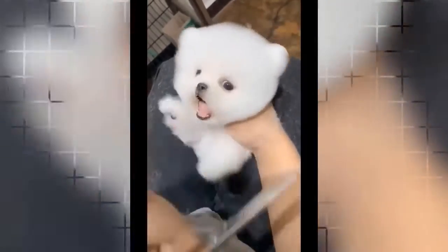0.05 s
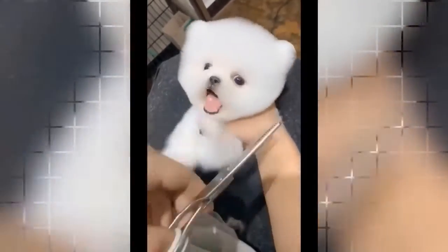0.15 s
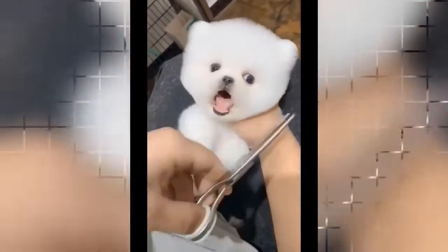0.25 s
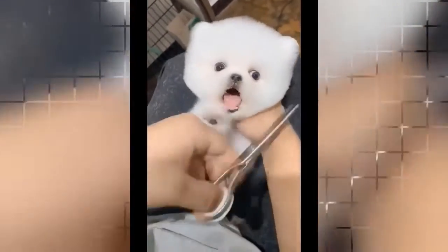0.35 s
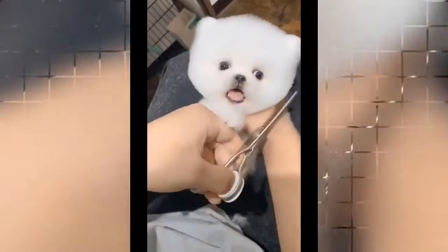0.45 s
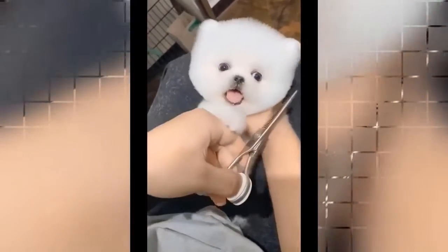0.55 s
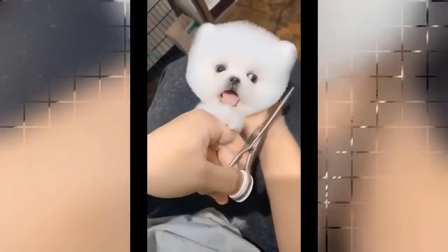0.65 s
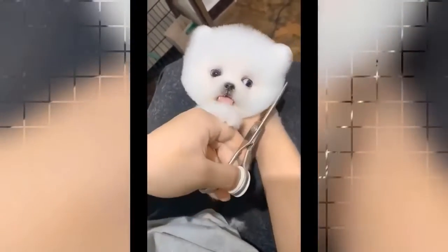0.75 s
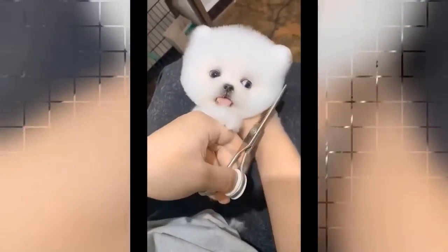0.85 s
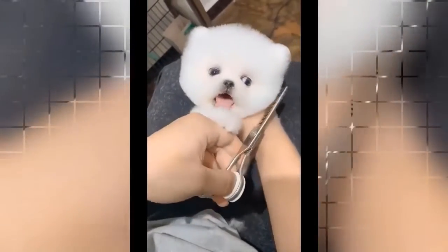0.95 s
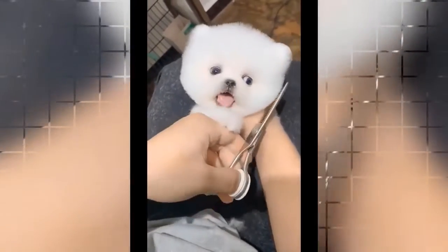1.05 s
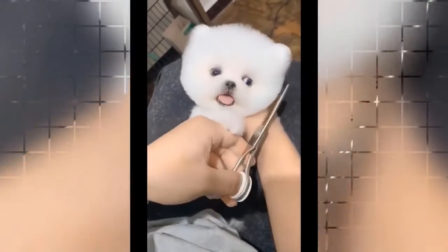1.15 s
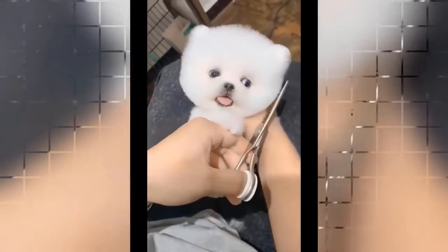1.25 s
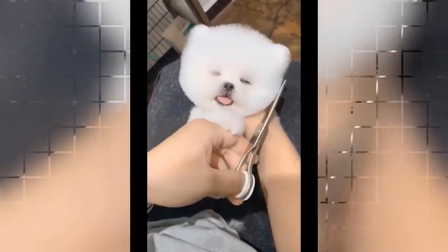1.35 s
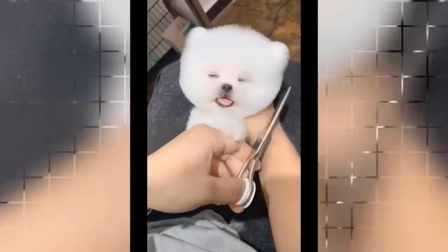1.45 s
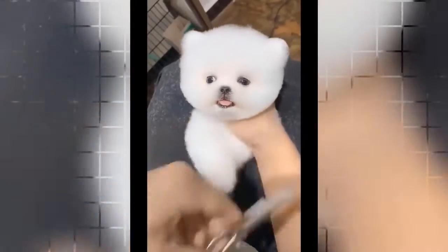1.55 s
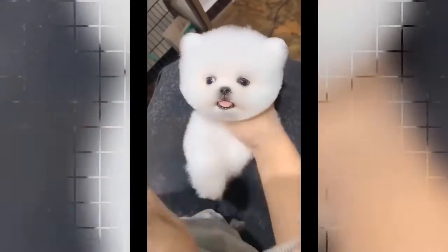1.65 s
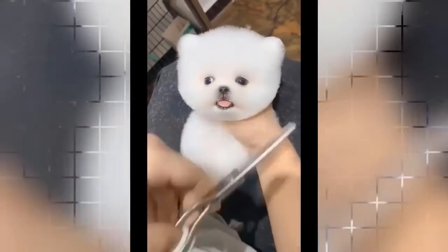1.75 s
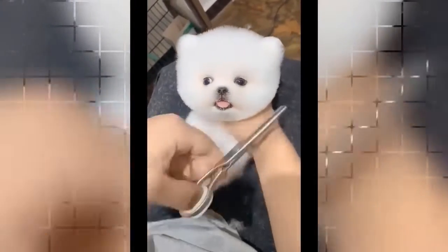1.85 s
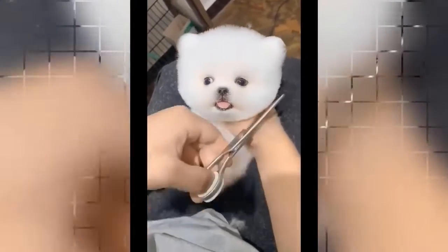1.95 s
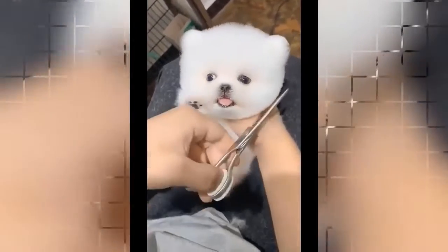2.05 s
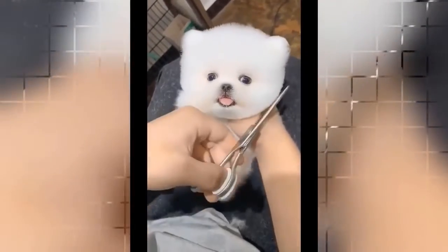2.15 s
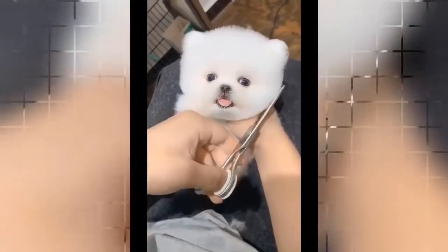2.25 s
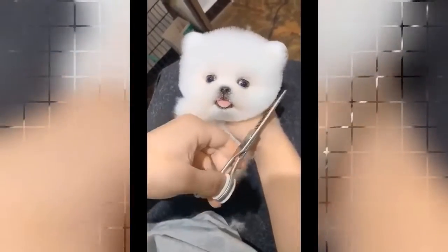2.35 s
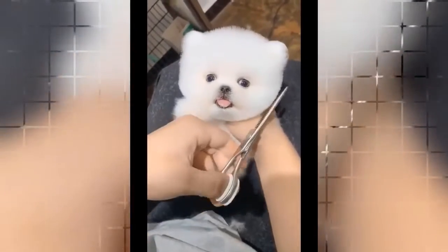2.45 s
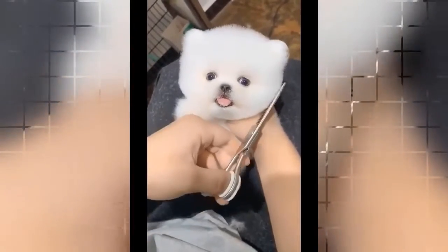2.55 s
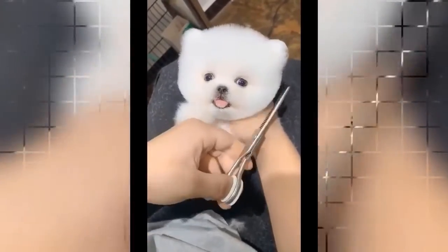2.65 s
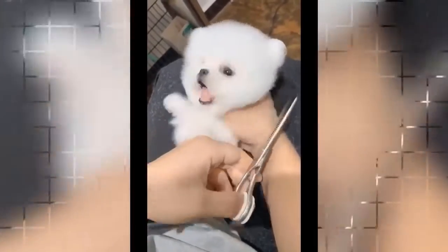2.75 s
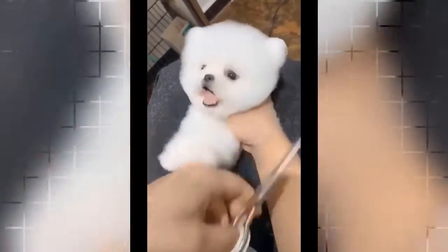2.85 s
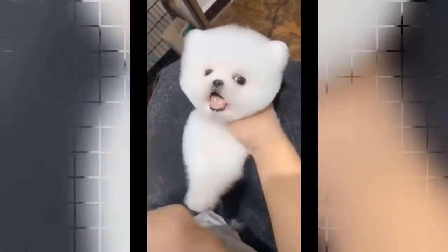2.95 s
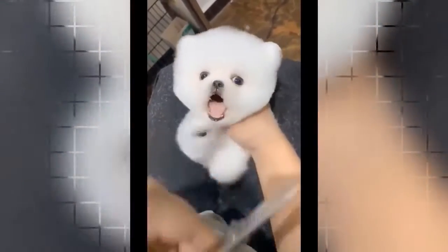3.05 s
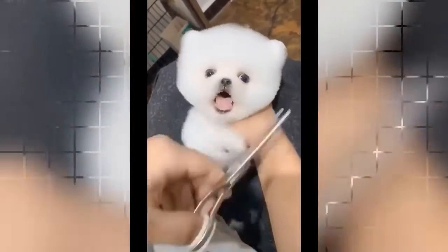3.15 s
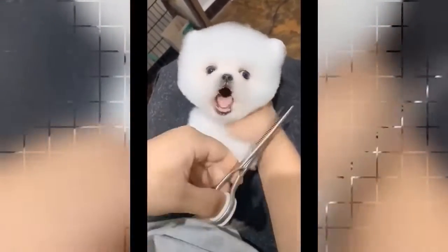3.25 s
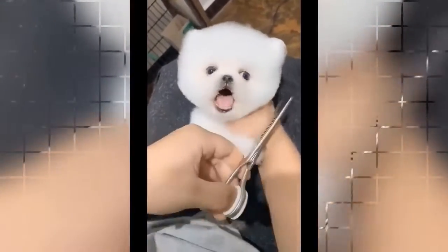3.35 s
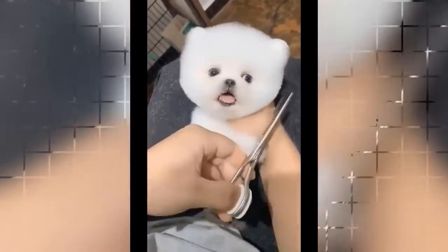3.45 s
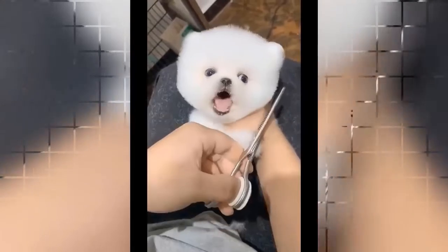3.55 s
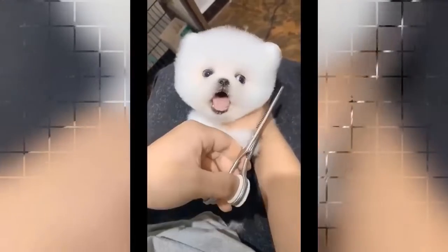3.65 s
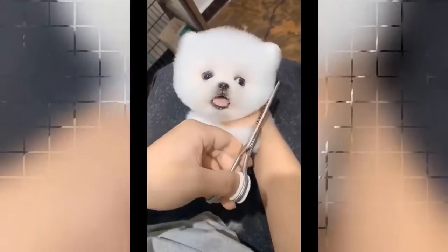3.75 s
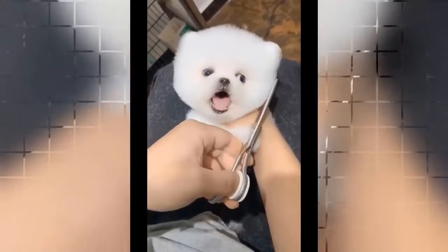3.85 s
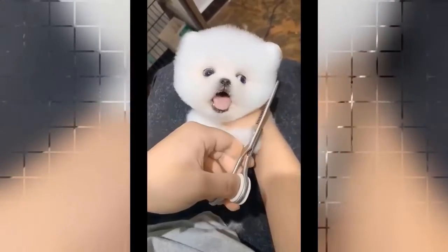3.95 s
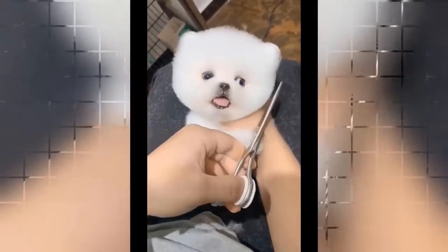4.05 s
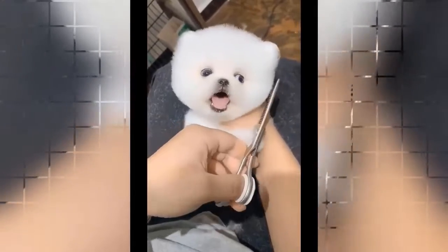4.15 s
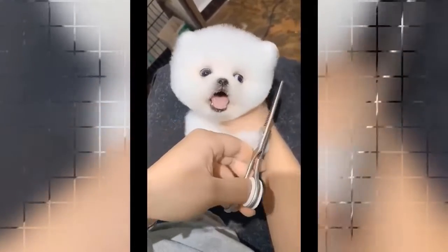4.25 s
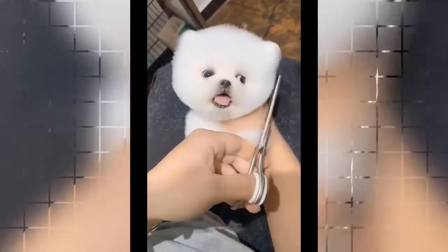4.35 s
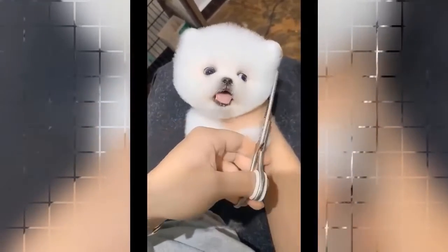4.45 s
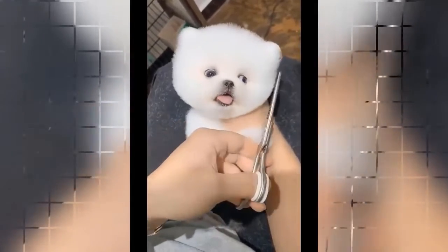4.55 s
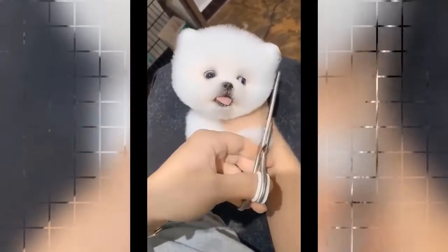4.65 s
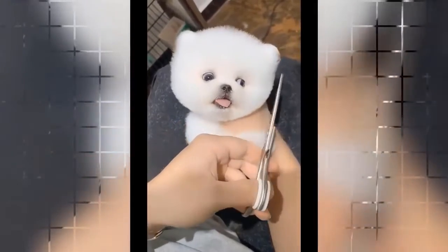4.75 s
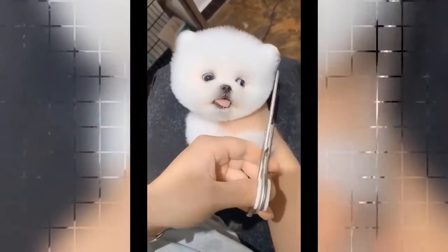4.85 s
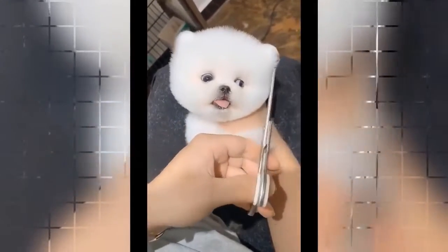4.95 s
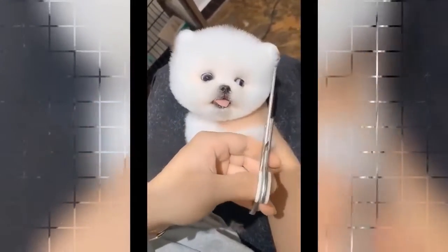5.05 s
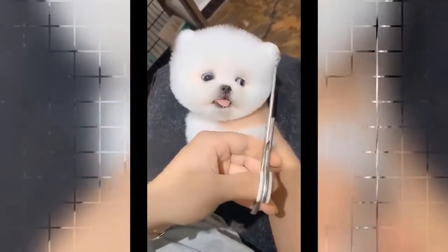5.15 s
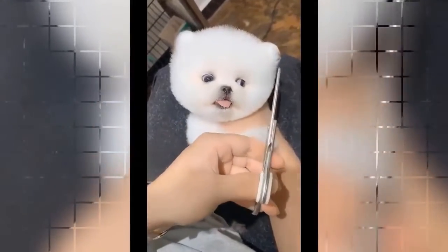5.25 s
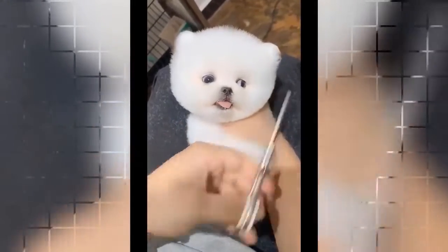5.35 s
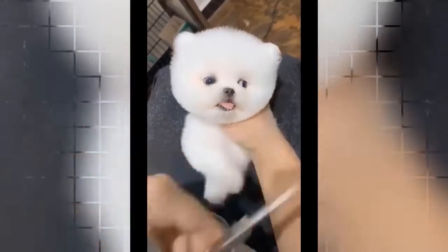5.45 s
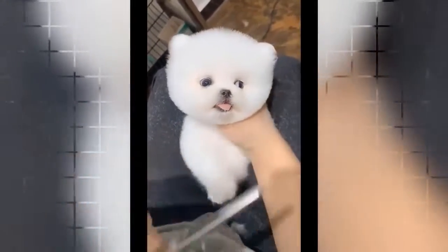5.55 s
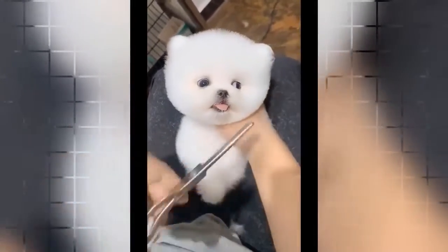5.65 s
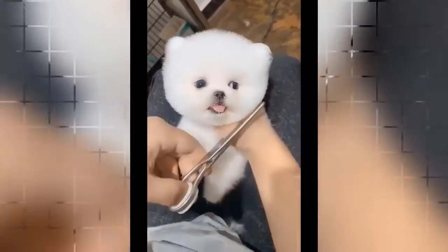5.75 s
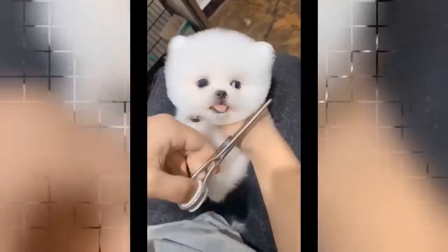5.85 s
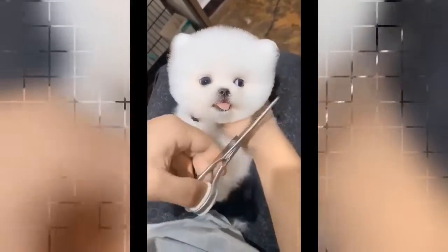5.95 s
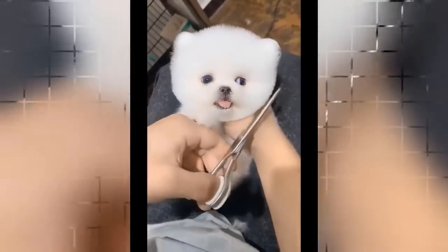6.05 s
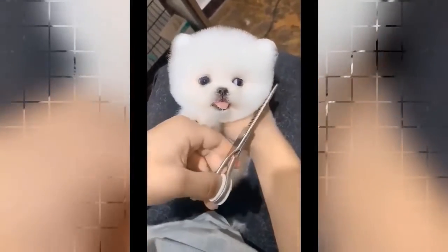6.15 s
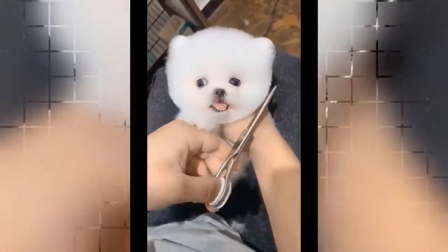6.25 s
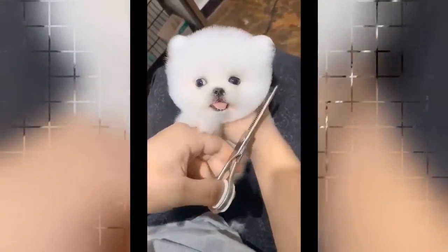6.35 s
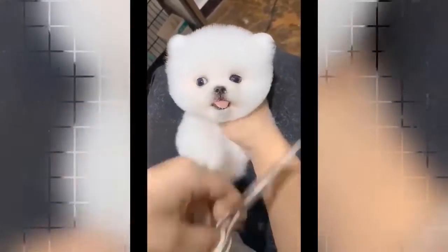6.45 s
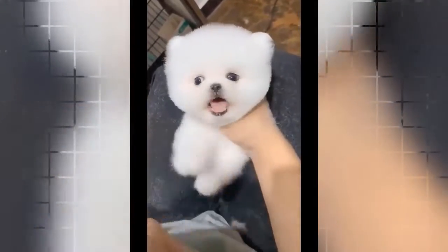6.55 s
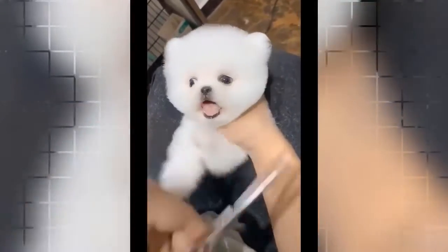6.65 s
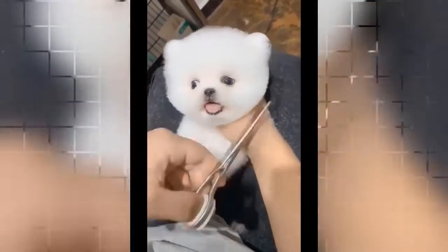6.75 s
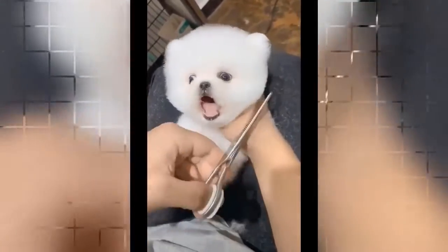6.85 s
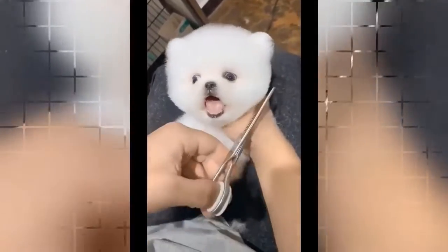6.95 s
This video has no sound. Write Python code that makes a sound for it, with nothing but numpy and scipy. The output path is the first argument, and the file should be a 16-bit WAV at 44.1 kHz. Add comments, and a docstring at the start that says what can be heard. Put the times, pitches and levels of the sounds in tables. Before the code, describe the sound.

In a small, quiet furnished room, a tiny puppy yips close to the microphone over low hum, faint steady tones and soft hiss. From 0.0 to 1.4 seconds come five high, squeaky yips, each about 0.15 seconds, rising fast then sagging breathily; the fourth is weaker. Light scissor ticks and fur rustle appear near 0.8. Between 1.5 and 2.9 the yapping stops: cloth and fur brush, the lap shifts with a dull low rumble strongest near 1.8, a tiny whimper squeaks, and small metal ticks sound. A faint indrawn whistle leads into seven regular, sharp yips from 3.0 to 4.9, about 0.3 seconds apart, the last softer. From 5.0 to 6.7 only very quiet whimpers, rustles and sparse ticks remain. One final bright yip comes at 6.9. The room adds a short, soft ring.

```python
"""A small furnished room: a tiny puppy on a lap yips close by in runs, about three a second, with soft whimpers.
Each call is a gliding stack of harmonics shaped by mouth and throat, turning breathy as the pitch sags.
Filtered noise whistles before some yips, fur rustles in noise strokes, and scissors tick as decaying sines.
A low hum, faint steady tones and hiss lie underneath; decaying noise gives the room's brief ring."""
import sys
import numpy as np
from scipy import signal
from scipy.fft import rfft, irfft
from scipy.io import wavfile
from scipy.ndimage import uniform_filter1d

SR = 44100
rng = np.random.default_rng(int(sys.argv[2]) if len(sys.argv) > 2 else 0)


def to_wav(s):
    """Save 16-bit WAV."""
    ch = np.atleast_2d(s).T  # columns
    pcm = np.round(np.clip(ch, -1, 1) * 32767)  # PCM
    wavfile.write(sys.argv[1], SR, pcm.astype(np.int16))


def volts_from_decibels(level):
    """Turn decibel levels (scalar or array-like) into linear amplitude factors."""
    exponent = np.asarray(level, float) / 20
    return 10 ** exponent


N = 307818
T = np.arange(N) / SR
TOP_HZ = 14000

# spectrum of the room hiss, before overall scaling: (frequency [Hz], density [dB per Hz])
AIR_SPECTRUM = [(41, -29.5), (70, -3), (102, -16.5), (194, -13), (431, -21.5), (550, -23), (750, -21),
                (1490, -28), (9820, -42.5), (14000, -55.5)]
AIR_DB, HUM_DB, HUM_WAVER_DB = -64, -58.5, 1
# faint steady tones of the room: (frequency [Hz], level [dB])
ROOM_TONES = [(549.1, -81), (651.4, -79.5), (1448, -81.5), (2051, -84), (2600, -87)]
# shifts of the lap: (loudest time [s], level [dB], swell per 20 dB [s], fade per 20 dB [s])
LAP_SHIFTS = [(1.522, -60.5, 0.05, 0.19), (1.766, -51.5, 0.072, 0.25)]
# pitch arches, one table a yip: (time [s], pitch [Hz], effort [dB], gape [0-1])
YIPS = [
    [(0.033, 517, -36, 0), (0.047, 690.3, -28.5, 0.32), (0.067, 857.7, -22, 0.35),
     (0.087, 908.6, -19.5, 0.32), (0.119, 859.3, -24.5, 0.35), (0.131, 716.7, -27.5, 0.23),
     (0.153, 701.4, -24, 0.61), (0.175, 661, -31, 0.76), (0.2, 670, -41.5, 0)],
    [(0.323, 572.6, -39.5, 0.2), (0.339, 694.6, -29.5, 0.36), (0.353, 767, -27.5, 0.2),
     (0.369, 756.7, -25, 0.98), (0.381, 789.6, -19, 0.73), (0.395, 813, -22.5, 0.42),
     (0.419, 697, -28.5, 0.46), (0.437, 561, -40, 0), (0.46, 536, -49, 1)],
    [(0.592, 540, -34, 0.5), (0.606, 726.4, -31.5, 0.64), (0.624, 689.3, -31.5, 0.85),
     (0.66, 787, -21, 0.73), (0.692, 650.6, -33.5, 0.14), (0.716, 542, -45.5, 0.15), (0.725, 487, -50, 0.6)],
    [(0.905, 461.2, -50, 0.5), (0.917, 521, -46, 0.8), (0.939, 663.5, -29.5, 0.4),
     (0.959, 673.7, -25.5, 0.55), (0.971, 639, -30.5, 0.5), (1.025, 443.2, -54, 0.86)],
    [(1.238, 475.3, -46.5, 0.5), (1.248, 584.7, -33.5, 0.55), (1.262, 726.4, -29, 0.56),
     (1.274, 818.6, -21.5, 0.5), (1.296, 833, -20.5, 0.36), (1.316, 732.8, -30.5, 0.7),
     (1.328, 661.5, -30, 0.3), (1.344, 555, -41, 0.58), (1.365, 518, -49.5, 0.9)],
    [(3.015, 551.3, -41.5, 0.5), (3.023, 644, -30, 0.35), (3.033, 755, -29.5, 0.53),
     (3.051, 912, -22, 0.35), (3.075, 957.5, -18.5, 0.5), (3.087, 941.4, -22, 0.84),
     (3.123, 794, -27, 0.62), (3.179, 735.6, -38, 0.48), (3.19, 760, -37, 0.6)],
    [(3.303, 529.5, -39.5, 0), (3.311, 628.4, -27.5, 0.8), (3.321, 727, -30, 0.16), (3.335, 855, -21, 0.65),
     (3.347, 861, -24.5, 0.55), (3.375, 851, -25.5, 1), (3.379, 824.4, -23, 0.7), (3.415, 578, -35.5, 0.1),
     (3.44, 475, -41.5, 0.4)],
    [(3.56, 472.2, -35.5, 0), (3.572, 632.6, -29, 0.84), (3.582, 746, -27.5, 0.4),
     (3.592, 863.5, -25, 0.84), (3.63, 913, -20, 0.47), (3.638, 877, -20, 0.9), (3.65, 792, -24.5, 0.61),
     (3.674, 664, -31.5, 0.5), (3.695, 532.9, -41.5, 0.9)],
    [(3.865, 505, -46, 0.15), (3.883, 652.2, -30.5, 0.38), (3.893, 754, -28, 0.36),
     (3.911, 884.6, -22, 0.54), (3.931, 912.6, -22, 0.35), (3.959, 753.5, -26.5, 0.54),
     (3.971, 661, -32, 0.3), (3.99, 581.5, -53, 0.6)],
    [(4.168, 533.8, -36.5, 0.66), (4.186, 682, -31, 0.33), (4.202, 811, -24.5, 0.22),
     (4.224, 838.7, -22, 0.37), (4.242, 728.8, -26, 0.5), (4.26, 631.3, -36, 0), (4.274, 602, -51, 0.77),
     (4.29, 556.4, -50.5, 0.5)],
    [(4.465, 510.5, -33, 1), (4.479, 632.5, -31.5, 0.25), (4.491, 758, -24.5, 0.56),
     (4.513, 900, -20.5, 0.43), (4.535, 901.4, -22, 0.54), (4.559, 725.5, -28, 0.7), (4.571, 618, -41, 0),
     (4.579, 603.5, -36.5, 0.5), (4.59, 569, -46, 1)],
    [(4.777, 460, -52.5, 0.5), (4.789, 553, -37, 0.85), (4.809, 690.5, -25.5, 0.5),
     (4.825, 697, -26.5, 0.73), (4.841, 672, -30, 0.82), (4.859, 551, -39, 0.02), (4.869, 481, -38, 0.82),
     (4.89, 440, -74, 0.8)],
    [(6.863, 480.3, -48, 0.8), (6.873, 608.5, -42, 0.67), (6.881, 685, -28.5, 0.46),
     (6.897, 856, -29, 0.34), (6.915, 973, -22, 0.15), (6.931, 948.5, -20.5, 0.83), (6.953, 827, -27.5, 1),
     (6.961, 793.2, -31, 0.4), (6.979, 804.4, -35.5, 0.6)],
]
# soft whimpers, one table each: (time [s], pitch [Hz], effort [dB], gape [0-1])
WHIMPERS = [
    [(1.735, 384, -47, .5), (1.747, 500, -46, 0.96), (1.76, 585, -47, .7), (1.773, 668, -43.5, 1),
     (1.779, 896, -48, 0.2), (1.797, 1006, -56, 0)],
    [(5.075, 390, -42, 1), (5.088, 428, -43.5, 0.37), (5.104, 451, -44.5, 0.1), (5.122, 528, -48, 0.67),
     (5.132, 531, -52.5, 0.7), (5.142, 455, -60, 0.67), (5.162, 450, -61, 1)],
    [(5.402, 696, -62, .5), (5.409, 712, -55, 0.53), (5.421, 731, -59.5, .5), (5.433, 787, -67, 0.34),
     (5.442, 790, -66, 0.4)],
    [(6.286, 551, -40, 0.56), (6.297, 574, -45, 0.73), (6.317, 657, -45.5, 0.9), (6.324, 678, -54, 0.76),
     (6.331, 834, -54, 0.3), (6.351, 861, -58, .4), (6.365, 851, -61, .5), (6.395, 910, -75, .6)],
    [(6.587, 590, -60, .5), (6.597, 633, -41.5, 0.45), (6.607, 630, -44.5, .6), (6.618, 777, -46.5, 0.57),
     (6.636, 875, -60, 0.35), (6.652, 900, -68, 0.56)],
]
# colour of each yip and whimper in turn: (fundamental at full effort [dB], throat resonance [Hz],
# throat against mouth [dB], treble against effort [dB])
CALL_COLOURS = [(-28, 3600, 4.5, -18.5), (-27.5, 3440, 5, -15.5), (-27, 3390, -3.5, -14),
                (-27.5, 3500, -6, -12.5), (-26.5, 3470, -5.5, -13.5), (-37.5, 2800, -18, -18),
                (-29, 3640, -4.5, -16.5), (-28, 3500, -4.5, -17.5), (-27, 3680, -7.5, -14),
                (-29.5, 3680, -3, -11), (-29, 3600, -3, -9.5), (-29.5, 3700, -8.5, -11.5),
                (-28.5, 3600, -15.5, -11.5), (-41, 3820, -20, -18), (-49, 3540, -24, -21),
                (-38, 3500, -27, -31), (-39.5, 3360, -14, -25), (-27.5, 3400, -1, -8.5)]
# a half-shut muzzle lowers the mouth resonance of each call: (drop [Hz]); negative raises it
MUZZLE_DROPS = [-0.5, 48.5, 99, 99.5, 1, 400, -1, 5, 4, -4, -2, 11.5, 50, 449, 398, 554, 453, -1]
# huskiness of each call: (extra breath and jitter [dB])
HUSKINESS = [2, 2, 3, 0, 0, 10, 0, 2, 0, 2, 0, 1, 0, 8, 14, 1, 4, 2]
# voice cracks: (time [s], half length [s], depth [0-1])
VOICE_CRACKS = [(0.118, .012, 0.02), (3.106, .012, 0.23), (3.968, .018, 0.47), (4.562, .018, 0.4),
                (5.134, 0.018, 0.48), (5.425, 0.026, 0.57), (6.94, .01, 0.13)]
# upper resonances, balanced against each other: (frequency [Hz], width [Hz], level [dB])
UPPER_RESONANCES = [(5322, 450, 10), (7320, 440, 8), (9280, 1100, 4.5), (11500, 580, -5.5)]
# breath against tone, rows for mouth, throat, treble, before huskiness and cracks:
# (at steady pitch [dB], added as the pitch sags by half [dB])
BREATHINESS = [(-20, 21), (-17, 22), (-9, 24)]
MOUTH_WIDTH_HZ, THROAT_WIDTH_HZ = 780, 510
BASE_JITTER, SHIMMER_DB = 0.004, 1.5  # jitter is a fraction of the pitch
# the fundamental follows effort only in part and thins out at high pitch
LOW_PER_EFFORT = 0.34
# weight of the fundamental: (pitch [Hz], gain [dB])
LOW_BY_PITCH = [(450, 3.5), (600, -1), (750, 0), (850, -4), (950, -5)]
# the fundamental is held back at either end of a call: the span and the dB at the very edge
LOW_ATTACK_S, LOW_ATTACK_DB, LOW_RELEASE_S, LOW_RELEASE_DB = 0.0042, -1.5, 0.012, -4
# the mouth resonance climbs with pitch and sinks as the gape widens
MOUTH_BASE_HZ, MOUTH_PER_PITCH, MOUTH_GAPE_HZ = 990, 1.176, 500
# a wide gape lets the throat out and holds back the fundamental and treble (dB per full gape)
GAPE_THROAT_DB, GAPE_LOW_DB, GAPE_TREBLE_DB = 24, 8, 4
# a sagging pitch muffles and lowers the throat and brightens the treble (for the whole pitch)
SAG_THROAT_DB, SAG_TREBLE_DB, SAG_THROAT_HZ = -25, 17, 298
# on the way up the arch, throat and treble are still veiled (dB for the whole pitch)
CLIMB_THROAT_DB, CLIMB_TREBLE_DB = -16, -2
# fur and cloth strokes: (loudest time [s], level [dB], swell per 20 dB [s], fade per 20 dB [s])
FUR_STROKES = [(.772, -59, 0.033, 0.055), (1.102, -71, .02, .04), (1.548, -58, 0.055, 0.046),
               (1.688, -54.5, 0.061, .14), (1.86, -61.5, 0.028, 0.076), (2.188, -73, 0.045, 0.068),
               (2.534, -67, 0.028, 0.022), (2.724, -68, 0.017, 0.035), (2.85, -63, .025, .025),
               (4.354, -65, 0.012, 0.044), (5.03, -66, 0.037, .03), (5.09, -63.5, 0.017, .2),
               (5.306, -74, 0.065, .04), (5.606, -60.5, 0.023, 0.036), (5.668, -71, .02, 0.12),
               (6.482, -64, 0.027, 0.029), (6.724, -64, .03, .025)]
# scissor ticks: (time [s], peak level [dB])
SCISSOR_TICKS = [(0.7713, -43), (0.7864, -41.5), (1.104, -51), (1.5505, -46.5), (1.6541, -52),
                 (1.7993, -49), (2.5339, -52.5), (2.7217, -49.5), (2.8472, -58), (4.352, -49),
                 (5.1727, -49.5), (5.6019, -52.5), (6.482, -53), (6.6351, -45), (6.7175, -54)]
# blade modes, before each tick's own variation: (frequency [Hz], level [dB], 60 dB decay [s])
BLADE_MODES = [(4900, -8.5, .012), (5000, 1.5, 0.01234), (6600, 5.5, 0.028), (8700, -5, 0.0084),
               (11300, -4, 0.014)]
# whistles of indrawn air: (start [s], end [s], frequency [Hz], level at full swell [dB])
INDRAWN_WHISTLES = [(2.981, 3.017, 2240, -44.5), (3.545, 3.564, 2250, -57), (3.844, 3.864, 2220, -52.5),
                    (4.138, 4.169, 2070, -44.5), (6.824, 6.884, 2010, -55)]
# room echo by band: (frequency [Hz], width [Hz], 60 dB decay [s], echo against direct [dB])
ROOM_ECHO = [(620, 1200, 0.33, -16), (1890, 2200, 0.3, -10.5), (4320, 6900, 0.2, -11.5),
             (9000, 5800, 0.1, -7.5)]


def level(x, db):
    """Scale to an rms level in dB."""
    return x * volts_from_decibels(db) / np.sqrt(np.mean(x ** 2))


def band(x, hz, width_hz):
    """Steep band-pass around a centre frequency."""
    edges = [hz - width_hz / 2, hz + width_hz / 2]
    return signal.sosfilt(signal.butter(2, edges, "bandpass", fs=SR, output="sos"), x)


def walk(rate, count):
    """Smooth random wander of spread near 1, drawn rate times a second."""
    hold = max(int(SR / rate), 1)
    steps = np.repeat(rng.standard_normal(count // hold + 1), hold)
    return 1.65 * uniform_filter1d(uniform_filter1d(steps, hold), hold)[:count]


def strokes(rows):
    """Gain of short movements: each swells and fades exponentially around its loudest moment."""
    t = T[::44]  # a coarse clock is enough for hand movements
    gain = sum(volts_from_decibels(db - 20 * np.maximum((s - t) / swell, (t - s) / fade)) for s, db, swell, fade in rows)
    return np.interp(T, t, gain)


def room_air():
    """Wavering low hum, narrow noise bands as faint tones, shaped hiss, and cloth rumble as the lap shifts."""
    hz, db = np.transpose(AIR_SPECTRUM)
    f = np.arange(N // 2 + 1) * SR / N + 1  # 1 Hz up, to keep the log finite
    hiss = irfft(rfft(rng.standard_normal(N)) * volts_from_decibels(np.interp(np.log(f), np.log(hz), db)), N)
    hum = volts_from_decibels(HUM_WAVER_DB * walk(4, N)) * level(band(rng.standard_normal(N), 46, 17), HUM_DB)
    tones = sum(level(band(rng.standard_normal(N), hz, 25), db) for hz, db in ROOM_TONES)
    rumble = strokes(LAP_SHIFTS) * level(band(rng.standard_normal(N), 251, 500), 0)
    return level(hiss, AIR_DB) + hum + tones + rumble


def layers(rows, colour, muzzle_hz):
    """Resonances and levels that follow from pitch, effort and gape."""
    s, hz, effort_db, gape = np.transpose(rows)
    full_db, throat_hz, throat_db, treble_db = colour
    wide = np.clip(gape, 0, 1) - 0.5
    sag = 1 - hz / np.maximum.accumulate(hz)
    climb = 1 - hz / hz.max() - sag

    low_db = full_db + LOW_PER_EFFORT * (effort_db - effort_db.max())
    low_db = low_db + np.interp(hz, *np.transpose(LOW_BY_PITCH)) - GAPE_LOW_DB * wide
    low_db = low_db + LOW_ATTACK_DB * np.clip(1 - (s - s[0]) / LOW_ATTACK_S, 0, 1)
    low_db = low_db + LOW_RELEASE_DB * np.clip(1 - (s[-1] - s) / LOW_RELEASE_S, 0, 1)

    # mouth and throat share the power of the effort
    balance_db = throat_db + GAPE_THROAT_DB * wide + SAG_THROAT_DB * sag + CLIMB_THROAT_DB * climb
    throat_share = 1 / (1 + volts_from_decibels(-2 * balance_db))
    mouth_db = effort_db + 10 * np.log10(1 - throat_share)
    throat_db = effort_db + 10 * np.log10(throat_share)
    treble_db = effort_db + treble_db + SAG_TREBLE_DB * sag + CLIMB_TREBLE_DB * climb - GAPE_TREBLE_DB * wide
    mouth_hz = MOUTH_BASE_HZ - muzzle_hz + MOUTH_PER_PITCH * hz - MOUTH_GAPE_HZ * wide
    throat_hz = throat_hz - SAG_THROAT_HZ * sag
    return s, hz, low_db, mouth_hz, mouth_db, throat_hz, throat_db, treble_db


def resonance(f, hz, width_hz, size=8):
    """Complex gain of a steep resonance (size and phase turn), renewed every few samples."""
    once = 1 / (1 + 1j * (f - hz)[:, ::size] / width_hz)
    return np.repeat(once * once * once, size, axis=1)[:, :len(hz)]


def call(rows, colour, muzzle_hz, husk_db):
    """One yip or whimper: vocal-fold harmonics and pulsed breath through mouth, throat and upper resonances."""
    s, hz, low_db, mouth_hz, mouth_db, throat_hz, throat_db, treble_db = layers(rows, colour, muzzle_hz)
    tail_s = 0.012
    t = np.arange(int(s[0] * SR), min(int((s[-1] + tail_s) * SR), N)) / SR
    count = len(t)
    onset = np.clip((t - t[0]) / 0.004, 0, 1) ** 2
    # the overtones bloom after the fundamental has started
    bloom = np.clip((t - t[0]) / 0.011, 0, 1)

    def smooth(curve):
        """Moving average that rounds the corners."""
        return uniform_filter1d(curve, size=400, mode="nearest")

    def glide(curve):
        """Rounded path through the table's points."""
        return smooth(smooth(np.interp(t, s, curve)))

    def loud(db):
        """Gain through the table's levels, with a soft start and end."""
        return onset * np.interp(t, np.r_[s, s[-1] + tail_s], np.r_[volts_from_decibels(db), 0])

    pitch = glide(hz)
    # slack folds close unevenly: roughness follows the fall from the highest pitch so far, less so the climb
    sag = 1 - pitch / np.maximum.accumulate(pitch)
    slack = sag + 0.4 * (1 - pitch / pitch.max() - sag)
    crack = sum(depth * np.exp(-((t - at) / half) ** 4) for at, half, depth in VOICE_CRACKS)
    jitter = BASE_JITTER * volts_from_decibels(husk_db) * (1 + 6 * sag) + 0.065 * crack
    phase = np.cumsum(pitch * (1 + jitter * walk(250, count))) / SR

    order = np.arange(2, 30)[:, None]
    f = order * pitch
    waves = -np.sqrt(2) * np.exp(2j * np.pi * order * phase) * (f < TOP_HZ)
    # the folds do not vibrate as one piece, so each overtone wavers by itself
    waves = waves * volts_from_decibels([2.4 * walk(60, count) for _ in order])
    # each upper resonance flickers as tongue and lips move, and climbs as the pitch sags
    upper = [(centre * (1 + 0.2 * sag), width, volts_from_decibels(db + 1.8 * walk(45, count)))
             for centre, width, db in UPPER_RESONANCES]
    shapes = [resonance(f, glide(mouth_hz), MOUTH_WIDTH_HZ),
              resonance(f, glide(throat_hz), THROAT_WIDTH_HZ),
              sum(gain * resonance(f, centre, width) for centre, width, gain in upper)]

    # air hisses through the folds once a cycle
    air = rng.standard_normal(count) * (1 + 0.6 * np.cos(2 * np.pi * phase))
    hisses = [band(air, 1800 - muzzle_hz, 1300),
              band(air, throat_hz.mean(), 1500),
              sum(gain * band(air, centre.mean(), 2 * width) for centre, width, gain in upper)]
    rasp = volts_from_decibels(30 * sag + husk_db + 20 * crack) * level(band(air, 480, 300), -28)

    out = loud(low_db) * (np.sqrt(2) * np.sin(2 * np.pi * phase) + rasp)
    for db, shape, hiss, (breath_db, slack_db) in zip([mouth_db, throat_db, treble_db], shapes, hisses, BREATHINESS):
        tone = (shape * waves).real.sum(axis=0) / np.sqrt((np.abs(shape) ** 2).sum(axis=0))
        breath = volts_from_decibels(breath_db + husk_db + 2 * slack_db * slack + 6.9 * crack)
        # breath takes over from tone at constant power
        mix = (tone + breath * level(hiss, 0)) / np.sqrt(1 + breath ** 2)
        shimmer = volts_from_decibels(SHIMMER_DB * walk(150, count))
        out = out + loud(db) * bloom * shimmer * mix
    # in a crack strong and weak cycles alternate, adding lines at half the pitch
    return out * (1 + crack * np.cos(np.pi * phase))


def puppy_calls():
    """All yips and whimpers, each voiced with its own colour, muzzle and huskiness."""
    out = np.zeros(N)
    calls = sorted(YIPS + WHIMPERS)
    for rows, colour, muzzle_hz, husk_db in zip(calls, CALL_COLOURS, MUZZLE_DROPS, HUSKINESS):
        voice = call(rows, colour, muzzle_hz, husk_db)
        start = int(rows[0][0] * SR)
        out[start:start + len(voice)] += voice
    return out


def rustle():
    """Hands brushing fur and cloth: grainy treble noise in short strokes."""
    grain = rng.standard_normal(N) * volts_from_decibels(2.4 * walk(200, N))
    brush = level(band(grain, 8000, 8000), 0) + level(band(grain, 2500, 3900), -2)
    return strokes(FUR_STROKES) * brush


def scissors():
    """Light touches ring the blade modes, each a little differently, with a short noise crack."""
    out = np.zeros(N + SR)
    t = np.arange(SR // 10) / SR
    for s, peak_db in SCISSOR_TICKS:
        variation_db = 3.3 * rng.standard_normal(len(BLADE_MODES))
        ring = sum(volts_from_decibels(db + vary - 60 * t / t60) * np.sin(2 * np.pi * hz * t)
                   for (hz, db, t60), vary in zip(BLADE_MODES, variation_db))
        snap = 0.42 * np.exp(-t / 0.005) * band(rng.standard_normal(len(t)), 7500, 9000)
        tick = ring + snap
        start = int(s * SR)
        # peak set by the ring and snap together
        out[start:start + len(t)] += volts_from_decibels(peak_db) * tick / np.abs(tick).max()
    return out[:N]


def indrawn_air():
    """Air drawn in before some calls: a narrow noise whistle and a wider hiss that swells later."""
    out = np.zeros(N)
    for start, end, hz, db in INDRAWN_WHISTLES:
        swell = np.interp(T, [start, end, end + 0.01], [0, 1, 0], left=0)
        air = rng.standard_normal(N)
        whistle = level(band(air, hz, 250), db)
        hiss = level(band(air, 2900, 1700), db + 2)
        out += swell * (whistle + swell * hiss)
    return out


def room_echo(near):
    """Diffuse echo: the near sound convolved with noise that decays at its own pace in each band."""
    t = np.arange(SR // 2) / SR
    rise = np.clip(t / 0.012, 0, 1)
    tail = np.zeros(len(t))
    for hz, width, t60, db in ROOM_ECHO:
        decay = band(rng.standard_normal(len(t)), hz, width) * volts_from_decibels(-60 * t / t60) * rise
        # scaled by the band's share of the whole range
        tail += np.sqrt(2 * width / SR) * level(decay, db)
    return signal.fftconvolve(near, tail / np.sqrt(len(t)))[:N]


def scene():
    """Near sources, their diffuse echo in the room, and the background, as one channel."""
    near = puppy_calls() + rustle() + scissors() + indrawn_air()
    return (near + room_echo(near) + room_air())[None]


def roll_off(x):
    """The treble ends steeply here."""
    return signal.sosfilt(signal.butter(12, 14360, fs=SR, output="sos"), x)


def record(dry):
    """The phone cuts the top with a steep low-pass."""
    low_pass = signal.ellip(8, 0.2, 70, TOP_HZ, fs=SR, output="sos")  # 0.2 dB ripple, 70 dB down
    mix = signal.sosfilt(low_pass, dry)
    return roll_off(mix)


dry = scene()
out = record(dry)
to_wav(out)
```